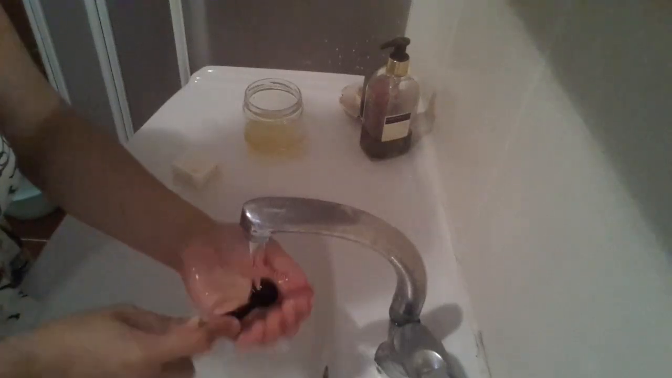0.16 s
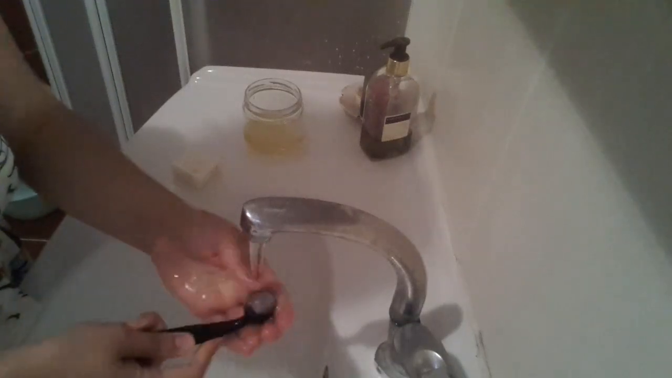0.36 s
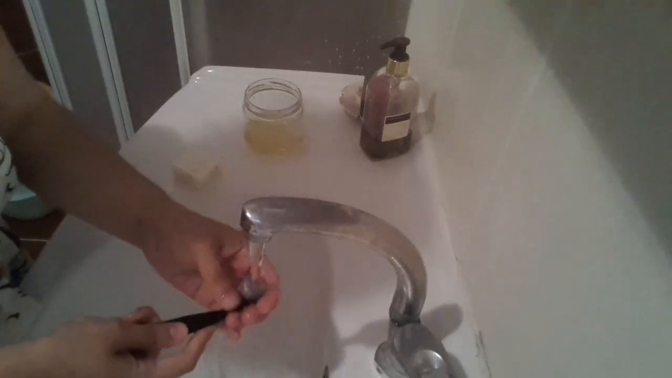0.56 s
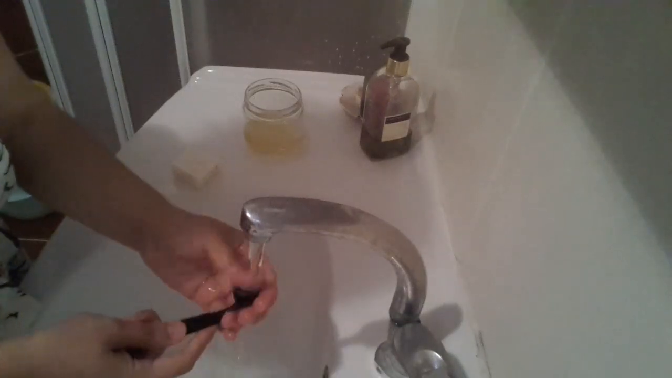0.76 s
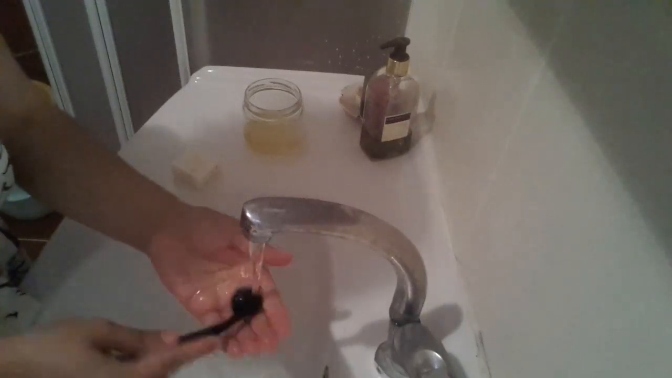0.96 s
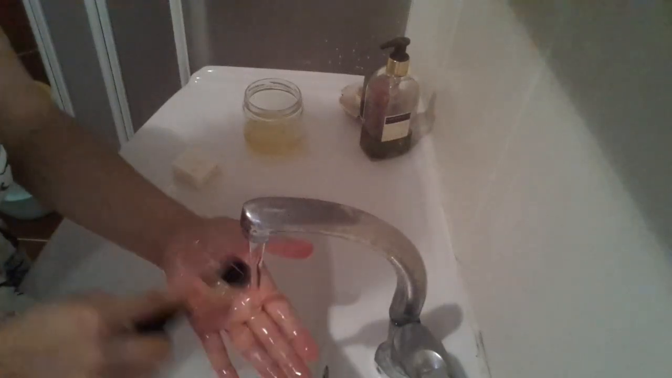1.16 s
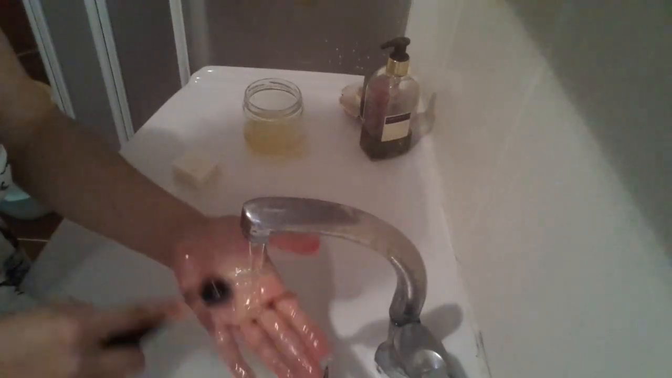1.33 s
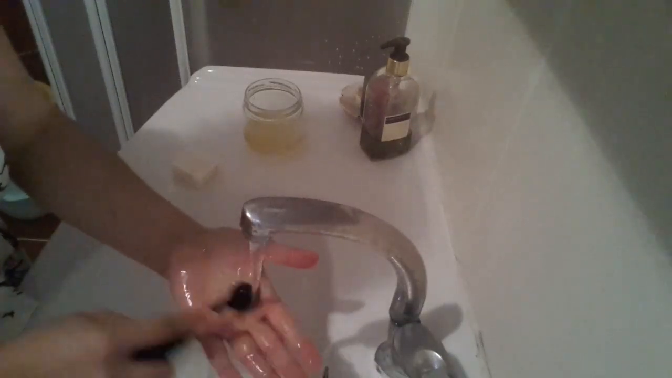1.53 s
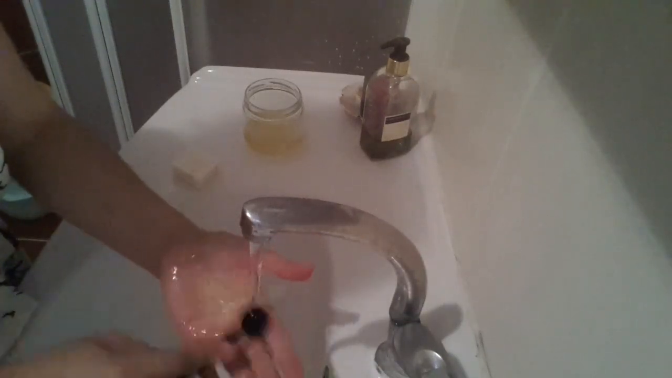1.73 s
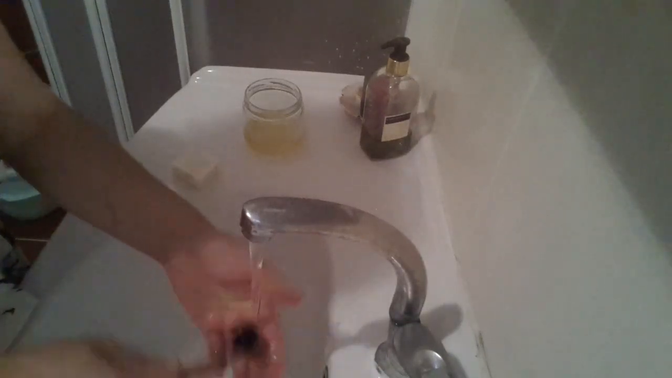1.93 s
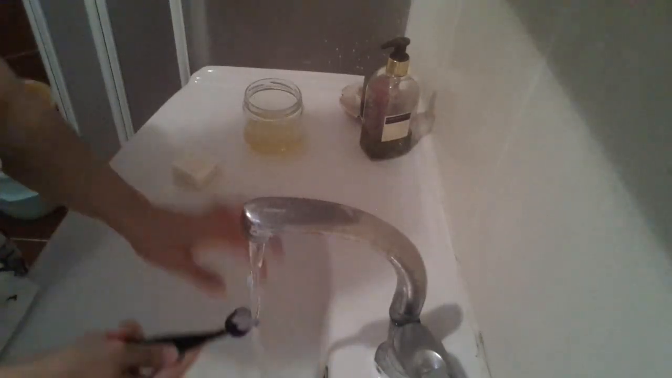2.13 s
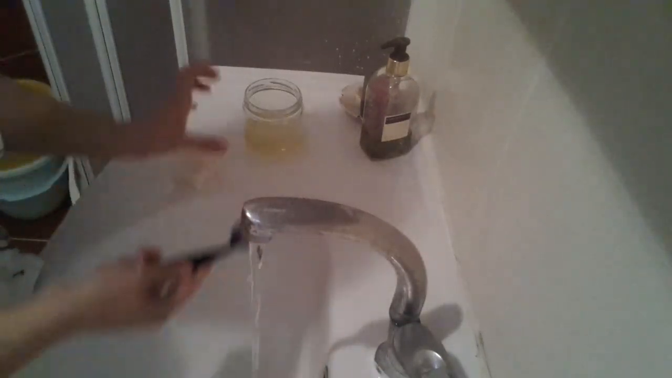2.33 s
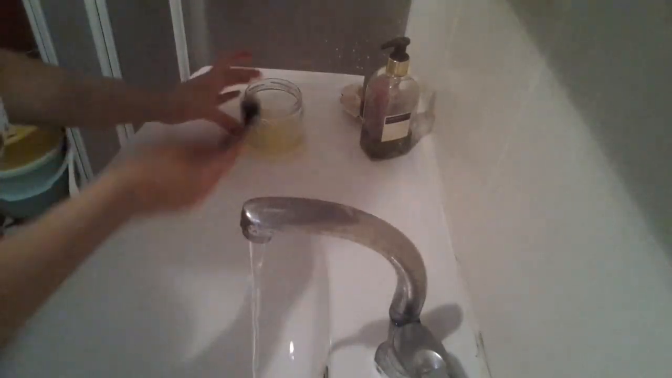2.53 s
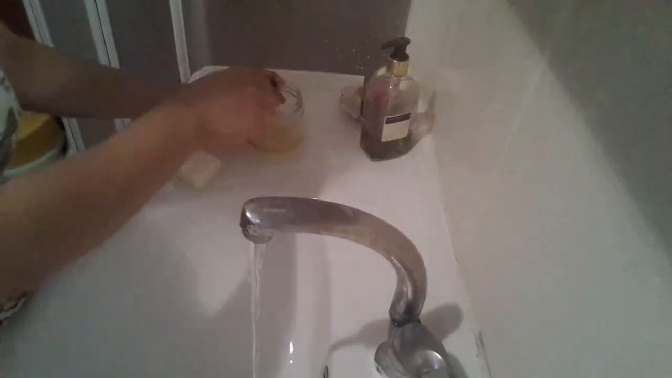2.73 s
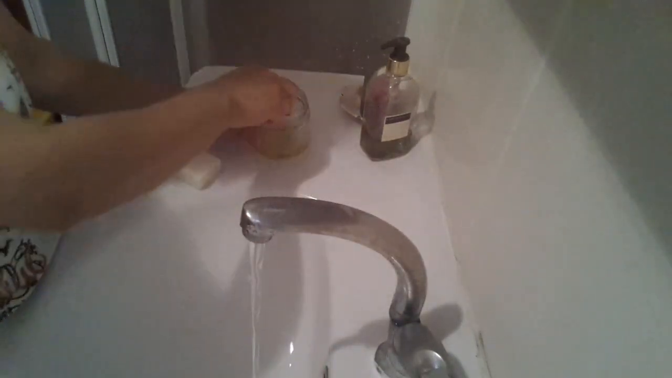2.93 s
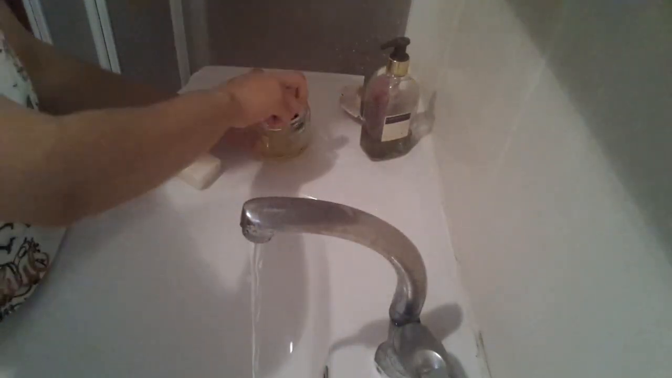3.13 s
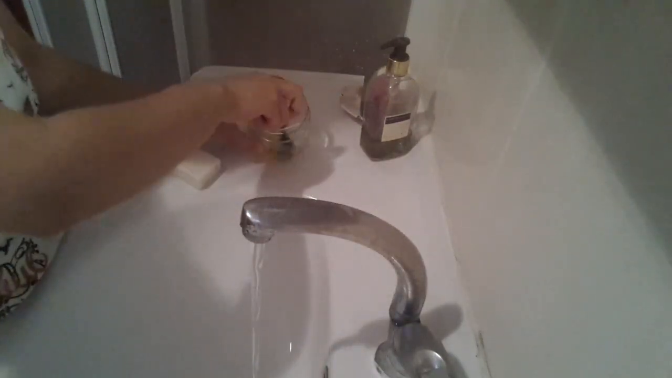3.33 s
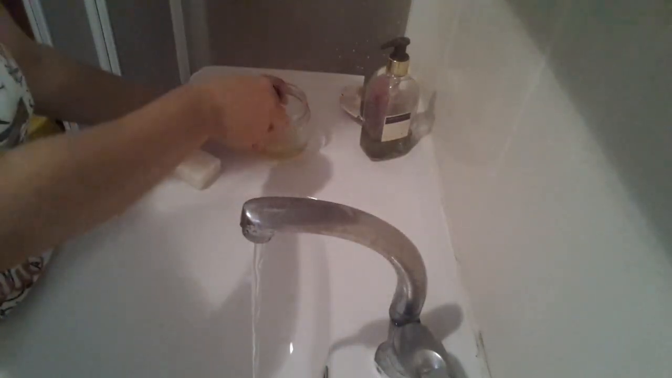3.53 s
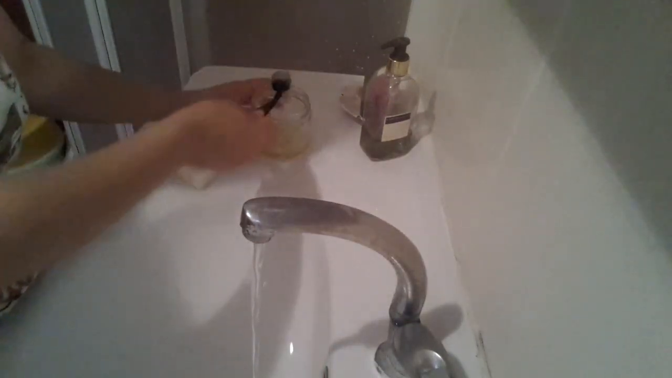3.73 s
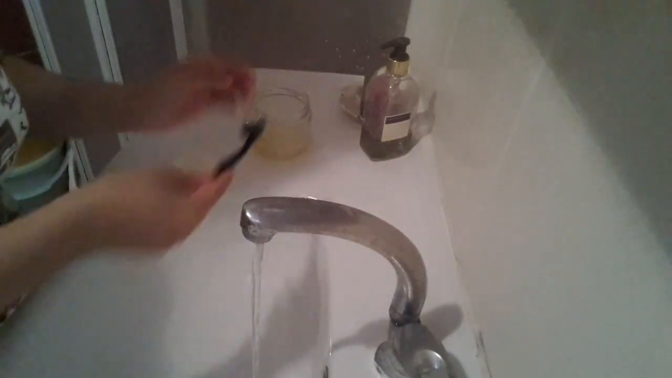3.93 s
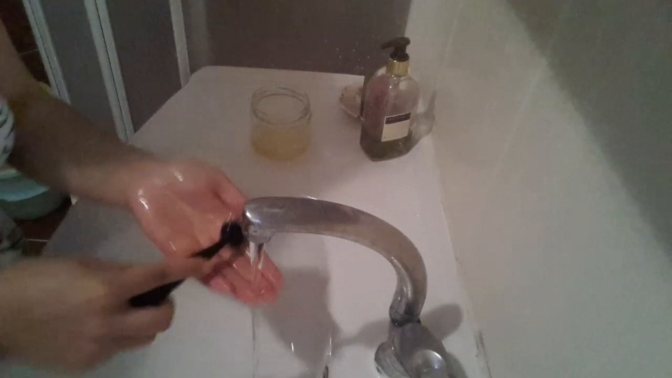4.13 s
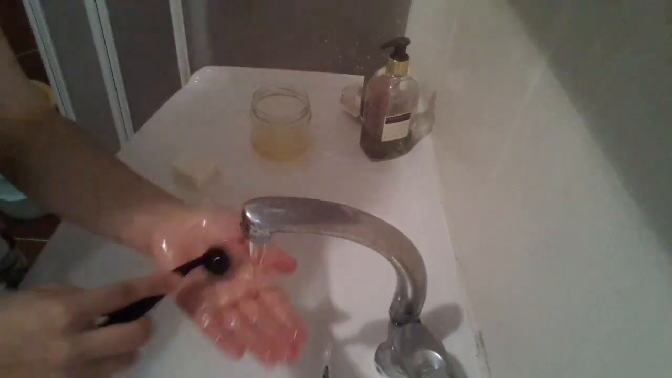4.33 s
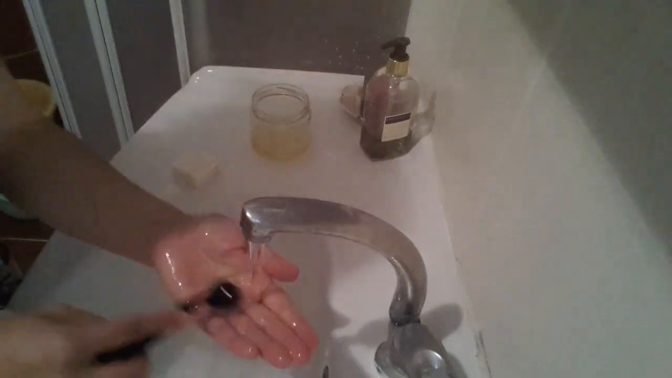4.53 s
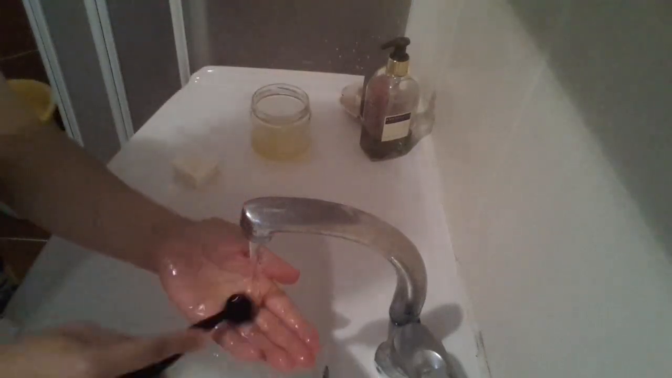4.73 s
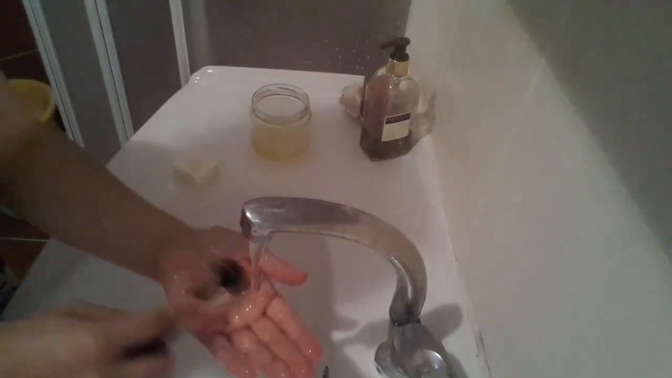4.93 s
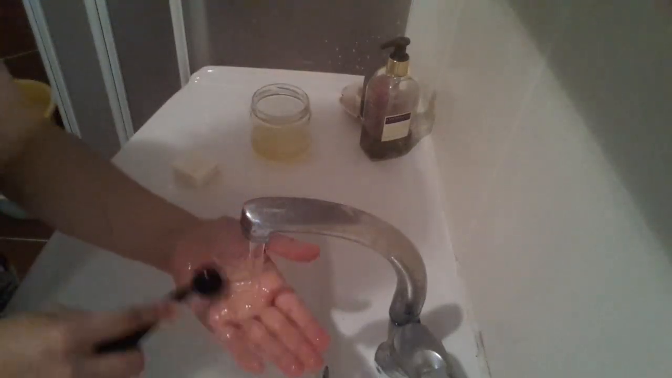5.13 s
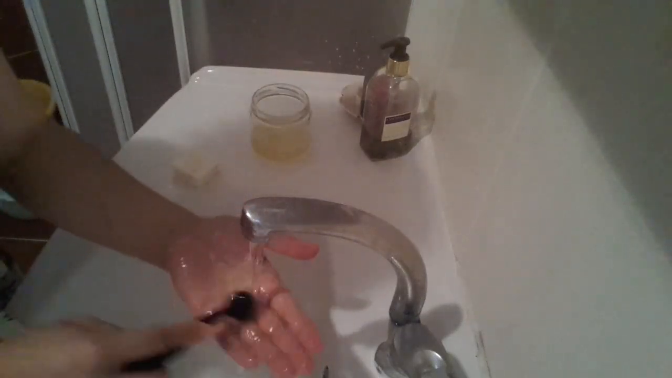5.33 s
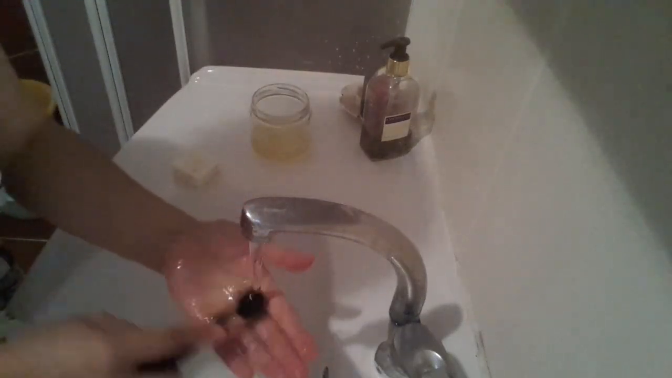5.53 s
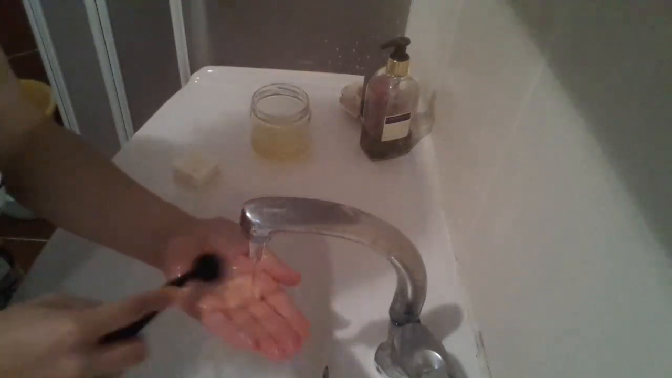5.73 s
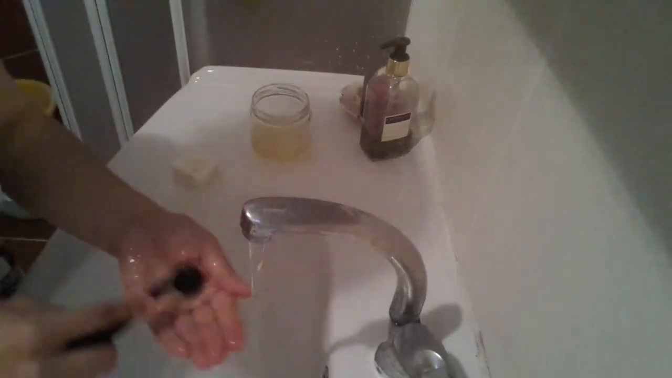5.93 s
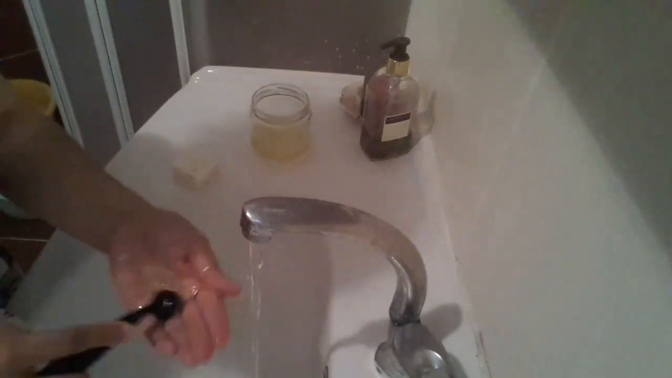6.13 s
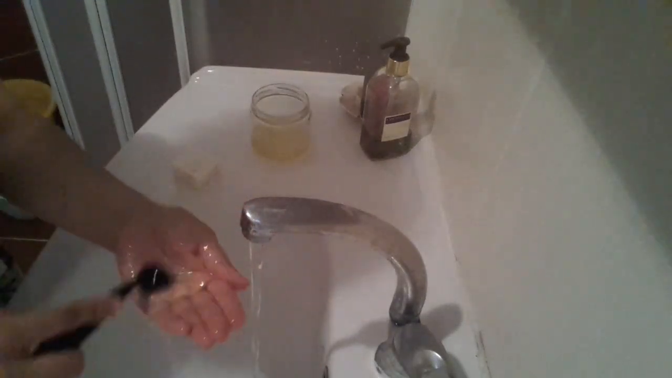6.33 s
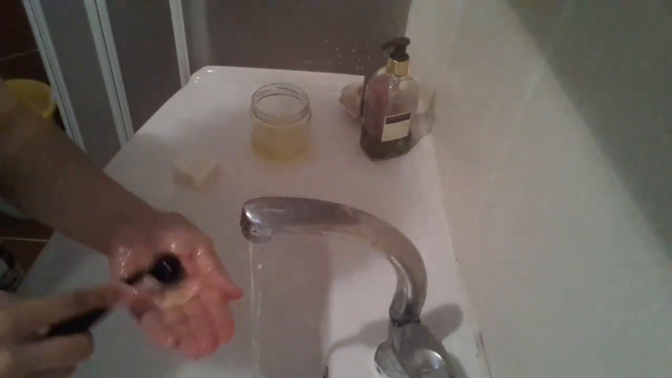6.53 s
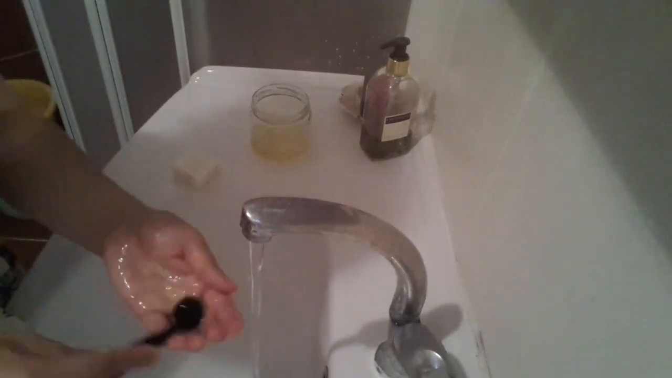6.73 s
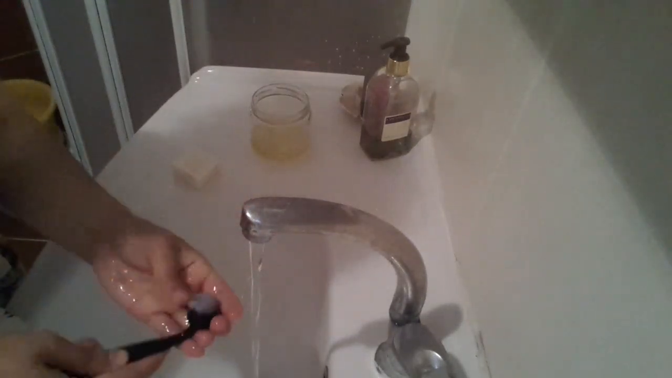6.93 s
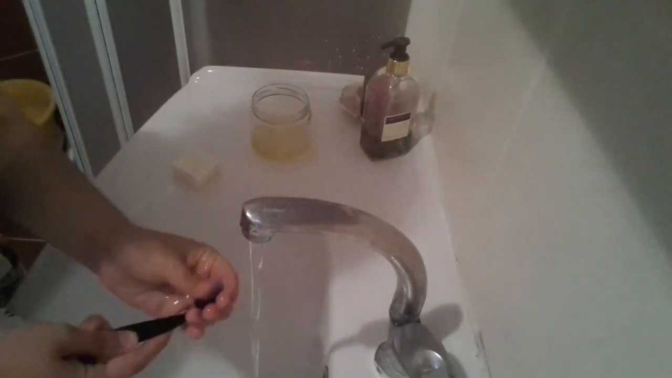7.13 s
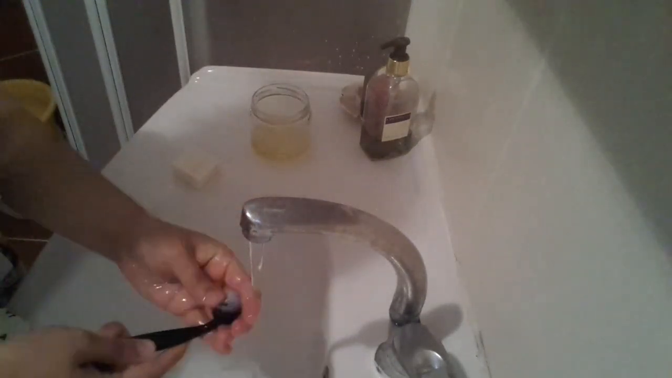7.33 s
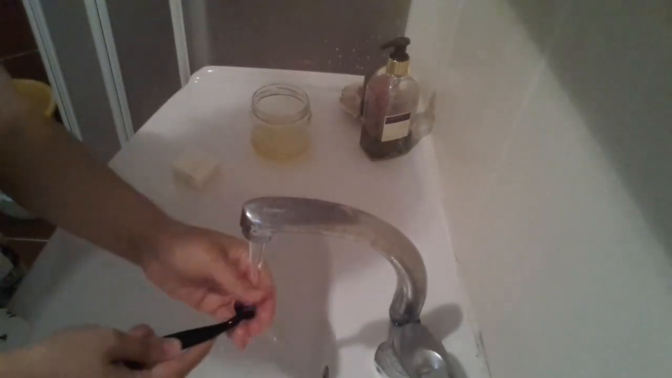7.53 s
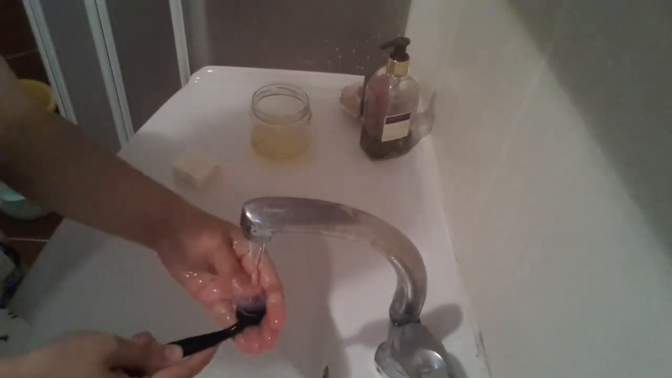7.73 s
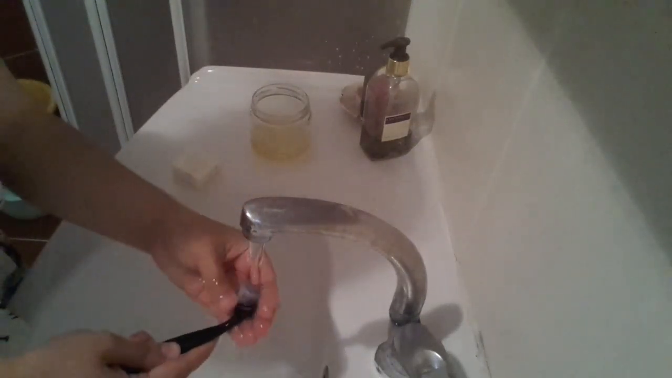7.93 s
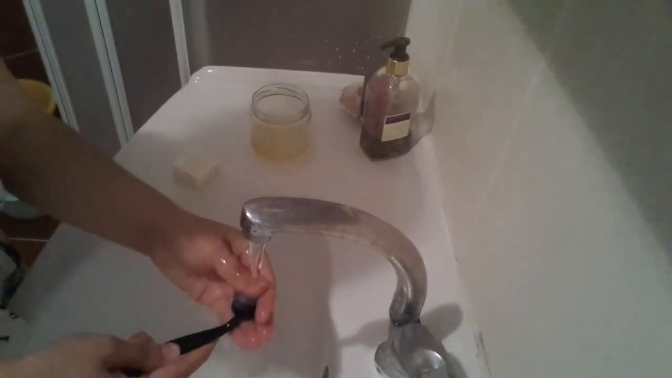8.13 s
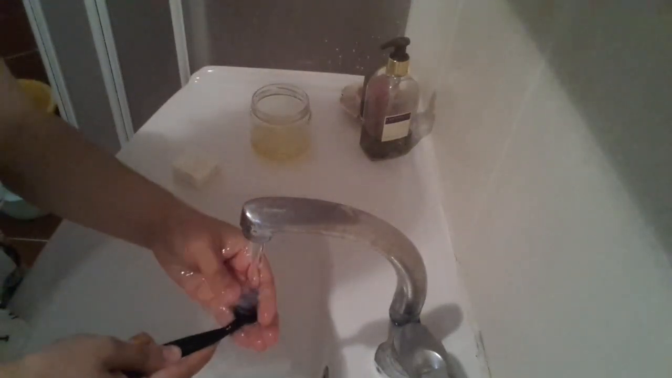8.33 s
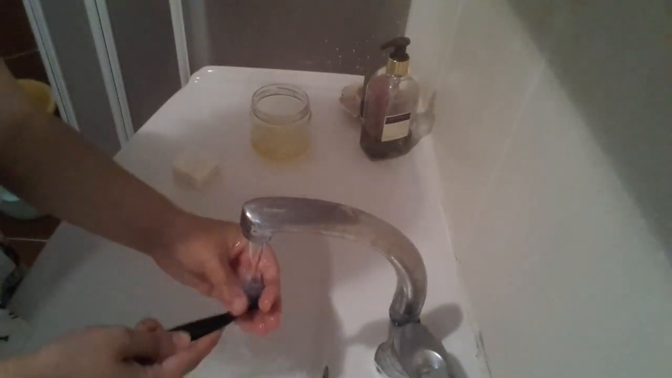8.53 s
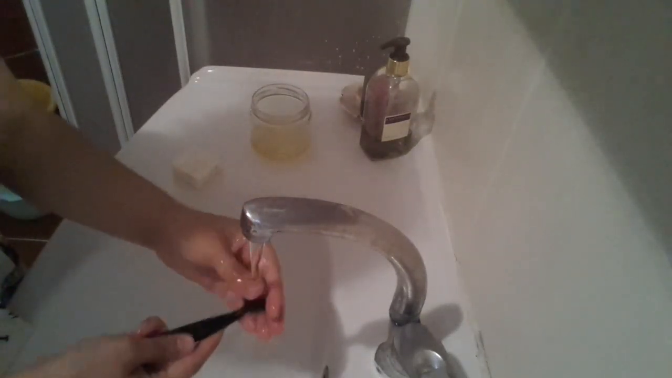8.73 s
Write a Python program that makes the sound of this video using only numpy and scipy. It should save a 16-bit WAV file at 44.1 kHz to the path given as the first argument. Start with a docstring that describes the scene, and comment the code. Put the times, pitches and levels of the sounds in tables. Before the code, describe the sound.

A bathroom tap runs steadily with a thin high whine while a wet brush squelches and crackles against a palm, then clinks in a glass jar.

```python
"""A tap runs into a basin in a small tiled bathroom: shaped noise with hollow resonances, and one thin valve note.
A wet brush is worked against a palm under the stream: air pockets squelch as rising pings, spray crackles as
thousands of tiny bursts, bubbles gulp at the drain as fading tones, and the hands slosh in lumps of dull noise.
About three seconds in, the brush is dipped into a glass jar: bristles scrape, the glass clinks, and the jar knocks
on the basin's rim. Glass and basin ring as sets of decaying tones."""
import sys
import numpy as np
from scipy import signal
from scipy.fft import rfft, irfft, next_fast_len
from scipy.io import wavfile

SR = 44100
rng = np.random.default_rng(int(sys.argv[2]) if len(sys.argv) > 2 else 0)


def unload_wav(signal):
    """Save mono or channel-first audio to the path in sys.argv[1] as 16-bit WAV at rate SR, clipped to [-1, 1]."""
    wavfile.write(
        sys.argv[1],
        SR,
        np.round(np.clip(np.atleast_2d(signal).T, -1, 1) * 32767).astype(np.int16),
    )


N = 386757
TIME = np.arange(N) / SR  # seconds
FREQ = np.fft.rfftfreq(N, 1 / SR)  # Hz


def undb(db):
    """Turn decibels into a gain."""
    return 10 ** (np.asarray(db) / 20)


def unit(x):
    """Scale a sound to an average (rms) level of 1."""
    return x / np.sqrt(np.mean(x ** 2))


def contour(points):
    """Join (Hz, value) points by straight lines on a log-frequency axis."""
    hz, value = np.transpose(points)
    return np.interp(np.log(FREQ + 1), np.log(hz), value)


def shape(x, gain):
    """Filter a sound with one gain for each frequency."""
    size = next_fast_len(N, True)
    gains = np.interp(np.fft.rfftfreq(size, 1 / SR), FREQ, gain)
    return irfft(rfft(x, size) * gains, size)[..., :N]


def band(x, lo_hz, hi_hz, order=2):
    """Keep the band between two frequencies, at least 20 Hz wide."""
    edges = np.clip([lo_hz, max(hi_hz, lo_hz + 20)], 10, SR / 2 - 20)
    return signal.sosfilt(signal.butter(order, edges, "band", fs=SR, output="sos"), x)


def walk(rate):
    """Random wander around 0: chance values, `rate` of them per second, joined by straight lines."""
    knots = rng.standard_normal(4096)
    return np.interp(TIME * rate, np.arange(len(knots)), knots)


def pan(db):
    """Left and right gains that differ by db; a positive value leans left."""
    gains = undb(np.array([[db], [-db]]) / 2)
    return gains / np.sqrt(np.mean(gains ** 2))


def add(out, s, x):
    """Mix a sound in at time s."""
    i = int(np.clip(s * SR, 0, N - 1))
    out[..., i:i + x.shape[-1]] += x[..., :N - i]


def swell(s, length_s, db, attack_s, release_s):
    """Gain of one gesture: it rises, holds until its length is over and dies away."""
    rise = np.clip((TIME - s) / attack_s, 0, 1)
    return undb(db) * rise * np.exp(-np.clip((TIME - s - length_s) / release_s, 0, 20))


def ring(modes):
    """Decaying tones after one blow, each starting at a chance phase."""
    t = TIME[:SR // 2]
    total = 0
    for hz, db, t60 in modes:
        total = total + undb(db - 60 * t / t60) * np.sin(2 * np.pi * (hz * t + rng.random()))
    return total


def pocket(hz, length_s, octaves):
    """An air pocket collapses: its pitch shoots up as it shrinks. Loudest at length_s, at pitch hz."""
    u = np.arange(int(4 * length_s * SR) + 2) / (length_s * SR)
    pitch = np.minimum(hz * 2 ** (octaves * np.tanh(u - 1)), SR / 2)
    swelling = (u * np.exp(1 - u)) ** 4
    return swelling * np.sin(2 * np.pi * np.cumsum(pitch) / SR)


# How alike left and right are. Each row: frequency in Hz, likeness from 0 (unrelated) to 1 (the same).
LIKENESS = [(40, 0), (120, 0.96), (330, 0.93), (520, 0.38), (1000, 0.19), (12000, 0)]


def spread(a, b):
    """Two unrelated sounds become left and right, most alike in the bass."""
    alike = np.clip(contour(LIKENESS), -1, 1)
    mid = shape(a, np.sqrt((1 + alike) / 2))
    side = shape(b, np.sqrt((1 - alike) / 2))
    return np.array([mid + side, mid - side])


# Balance of the two microphone ports. Each row: frequency in Hz, left minus right in dB.
BALANCE = [(100, -1.8), (1000, -.5), (2200, 0.2), (4000, 2), (5500, -2), (8000, -9), (12000, -8)]


def ports(x):
    """The high treble reaches mainly the right port."""
    tilt = undb(contour(BALANCE))
    norm = np.sqrt(2 / (1 + tilt ** 2))
    return np.array([shape(x[0], tilt * norm), shape(x[1], norm)])


ROOM_T60_S = 0.52  # seconds for the lower part of the echo to fall by 60 dB


def room(x, wet_db, treble_t60_s=0.12):
    """Close tiled walls: separate early echoes thicken into a tail whose treble dies sooner."""
    t = TIME[:SR // 2]
    sparse = undb(7 * np.exp(-t / .03) * np.minimum(rng.standard_normal((2, len(t))), 2))
    noise = rng.standard_normal((2, len(t))) * sparse
    low = signal.sosfilt(signal.butter(1, 3000, fs=SR, output="sos"), noise)
    tail = low * 10 ** (-3 * t / ROOM_T60_S) + (noise - low) * 10 ** (-3 * t / treble_t60_s)
    tail = tail * np.clip(t / 0.0035, 0, 1) * (1 + 2.47 * np.exp(-t / 0.005))  # the basin reflects first
    tail /= np.sqrt(np.sum(tail ** 2) / 2)
    return x + undb(wet_db) * signal.fftconvolve(x, tail, axes=1)[:, :N]


# Tone colour of the tap's steady rush. Each row: frequency in Hz, relative level per Hz in dB.
RUSH = [(18, -59), (30, -20.5), (143, -6.5), (190, -7.5), (228, -10.5), (394, -18.5), (485, -23.5),
        (735, -28), (830, -30), (1250, -15), (1600, -13), (2700, -10), (3410, -5.5), (8250, -9.5),
        (15000, -14)]
# Hollow tones of the running water in basin and pipe.
# Each row: frequency in Hz, nominal width in Hz (the filter is half as wide), relative level in dB.
HOLLOWS = [(132.7, 8.9, -72), (393.5, 25, -67), (595, 45, -67.5), (985, 90, -63), (1600, 35, -57),
           (2316, 68, -58.5), (3190, 140, -57), (4550, 280, -52), (8280, 180, -51.5), (9170, 320, -51.5),
           (10500, 1000, -49.5)]


def rush(level_db=-39.5, grain_db=3, flicker_db=1, hollow_db=-1.0, wander_db=3.5):
    """The stream's fine-grained hiss, with hollow resonances that come and go, the low ones most."""
    noise = rng.standard_normal((2, N)) * undb(grain_db * rng.standard_normal((2, N)))
    hiss = shape(noise, undb(contour(RUSH)))
    hiss /= np.std(band(hiss, 3200, 15000))
    hiss *= undb(level_db + flicker_db * walk(30))
    drive = rng.standard_normal((2, N))
    for hz, width_hz, db in HOLLOWS:
        hollow = band(drive, hz - width_hz / 4, hz + width_hz / 4, order=1) * np.sqrt(SR / width_hz)
        depth_db = wander_db * np.sqrt(min(1000 / hz, 2))
        hiss += hollow * undb(db + hollow_db + depth_db * walk(7))
    return spread(*hiss)


# The valve's note. Each row: time in seconds, pitch in Hz, relative level in dB.
WHISTLE = [(0.0, 2995, -40), (0.85, 2985, -42.5), (1.9, 2987, -38), (2.32, 2990, -45), (2.54, 2982, -40),
           (3.61, 3003, -43), (4.78, 2994, -36.5), (5.94, 2997, -38.5), (6.03, 2990, -41.5),
           (7.11, 3002, -39.5), (7.23, 3005, -42), (8.77, 2990, -39)]


def whistle(waver_db=2.0, pan_db=3, lead=1.565, gain_db=2):
    """The valve sings a nearly pure note that wavers in level; left leads right by `lead` radians."""
    s, pitches, levels = np.transpose(WHISTLE)
    hz, db = np.interp(TIME, s, pitches), np.interp(TIME, s, levels)
    phase = 2 * np.pi * np.cumsum(hz + 1.47 * walk(25.35)) / SR
    sides = [np.sin(phase + shift) * undb(waver_db * walk(8.3)) for shift in (lead, 0)]
    return np.sqrt(2) * undb(db + gain_db) * pan(pan_db) * np.array(sides)


# Strokes of the brush over the wet palm. Each row: start in seconds, length in seconds, relative level in dB.
STROKES = [(-.01, .17, -33.5), (0.375, .06, -29), (0.548, .52, -35.5), (0.598, .05, -30), (0.804, .12, -35),
           (1.351, .17, -35.5), (1.559, .055, -26), (1.637, .06, -32), (1.783, .39, -38),
           (2.182, .3, -31.5), (2.296, .06, -25.5), (4.477, 0.014, -31.5), (4.86, .29, -31.5),
           (5.205, .23, -33), (5.483, .38, -34), (5.892, 0.12, -32), (6.043, .14, -37), (6.192, .18, -29),
           (6.412, .15, -41.5), (7.645, .04, -30), (7.89, .07, -33.5), (8.052, .2, -33.5),
           (8.289, .11, -33), (8.422, .14, -32.5)]


def rubbing(uneven_db=3.5, uneven_rate=25, attack_s=0.02, release_s=0.03):
    """How hard the bristles work: the strokes, with uneven pressure."""
    power = sum(swell(s, length, db, attack_s, release_s) ** 2 for s, length, db in STROKES)
    return np.sqrt(power) * undb(uneven_db * walk(uneven_rate))


def spray(effort, count=7000, scatter_db=5, pitch_hz=6500, octaves=0.525, gain_db=-3.0, fizz_db=-1.5):
    """Thousands of tiny pockets and droplets burst over a fizz of bristles, as loud as the brush works."""
    drops = np.zeros((2, N))
    for (when, life), (size, high, side) in zip(rng.random((count, 2)), rng.standard_normal((count, 3))):
        hz = pitch_hz * 2 ** (octaves * max(high, -2))
        burst = pocket(hz, (1 + 3 * life) / hz, 0.44)
        add(drops, when * N / SR, undb(scatter_db * min(size, 2)) * pan(4 * side) * burst)
    # Fizz colour: frequency in Hz, relative level in dB
    colour = [(500, -61), (1500, 0.0), (2500, 9.5), (4300, 9.0), (8500, 16.5), (14000, 9.0)]
    fizz = shape(rng.standard_normal((2, N)), undb(contour(colour)))
    fizz = unit(fizz) * undb(2 * walk(120))
    return unit(unit(drops) + undb(fizz_db) * fizz) * effort * undb(gain_db)


# Big air bubbles that gulp at the drain. Each row: start in seconds, relative peak level in dB, pitch in Hz.
BUBBLES = [(.055, -32, 319), (.286, -34, 330), (.331, -32, 342.6), (.367, -30, 345), (0.41, -34.5, 411),
           (.45, -34.5, 344), (0.489, -34.5, 342.5), (.593, -33, 345.5), (0.612, -36, 415),
           (.655, -42.5, 339), (.731, -39, 401), (0.789, -39.5, 326), (0.871, -31.5, 348),
           (1.464, -34, 353), (1.496, -28, 402), (1.533, -29, 391.6), (1.667, -29.5, 406),
           (1.704, -26, 391.6), (1.883, -36.5, 349.5), (2.233, -27.5, 385), (2.373, -23.5, 367),
           (2.394, -27.5, 399), (2.554, -30, 392.4), (6.266, -23.5, 449), (6.293, -31, 400)]


def bubbles(rise=0.016, gain_db=-2.5, ring_cycles=116, attack_s=0.00082):
    """A bubble pinches off and rings down, rising slightly; the big, low ones last longest."""
    out, t = np.zeros(N), TIME[:SR // 2]
    for s, db, hz in BUBBLES:
        age = hz * t / ring_cycles  # reaches 1 when the tone has fallen by 60 dB
        phase = 2 * np.pi * np.cumsum(hz * (1 + rise * np.minimum(age, 1))) / SR
        fade = np.minimum(t / attack_s, 1) * np.exp(-np.log(1000) * age)
        add(out, s, undb(db + gain_db) * fade * np.sin(phase))
    return np.array([out, out])


# Dull sloshes and rubs as the hands move.
# Each row: start in seconds, length in seconds, relative level in dB, centre in Hz.
SLOSHES = [(0.279, 0.67, -53.5, 360), (1.456, 0.35, -51, 380), (1.656, 0.1, -48.5, 513),
           (2.237, 0.068, -44.5, 440), (2.365, 0.17, -40.5, 380), (2.453, 0.07, -46, 272),
           (2.594, 0.43, -50.5, 160), (2.837, 0.056, -44.5, 388), (2.946, 0.16, -51.5, 445),
           (4.886, 0.037, -49, 380), (5.648, 0.04, -42, 326), (6.261, 0.099, -36.5, 382),
           (8.08, 0.16, -53, 1890)]
SLOSH_ATTACK_S, SLOSH_RELEASE_S = 0.0033, 0.022  # the scrapes use these too


def slosh(lump_db=3, typical_hz=415):
    """Uneven lumps of dull, broad noise, each gesture coloured higher or lower."""
    # Colour of a typical slosh: frequency in Hz, relative level in dB
    colour = np.array([(60, -44), (140, -23.0), (380, 9.0), (540, 0), (800, -4.0),
                       (1200, -9.0), (1800, -20.0), (3000, -23.0), (7000, -69)])
    noise, out = rng.standard_normal((2, N)) * undb(lump_db * walk(90)), 0
    for s, length, db, hz in SLOSHES:
        lumps = shape(noise, undb(contour(colour * [hz / typical_hz, 1])))
        out = out + unit(lumps) * swell(s, length, db, SLOSH_ATTACK_S, SLOSH_RELEASE_S)
    return out


def spatter(drops_per_s=150, level_db=-4, scatter_db=3, pitch_hz=1600, octaves=0.365, cycles=4.9):
    """Sloshing water flings drops that plip into the basin, lower than the brush's pockets."""
    out = np.zeros((2, N))
    for start, length, db, _ in SLOSHES:
        drops = rng.standard_normal((40, 4))[:int(drops_per_s * length)]  # at most 40 for each slosh
        for when, size, high, side in drops:
            hz = pitch_hz * 2 ** (octaves * np.clip(high, -2, 2))
            gains = undb(db + level_db + scatter_db * min(size, 1.5)) * pan(3 * side)
            add(out, start + length * (when % 1), gains * pocket(hz, cycles / hz, 0.1))
    return out


def weak_squelches(effort, count=60, level_db=-26, scatter_db=4, octaves=0.38):
    """Lesser pockets burst by chance, more often the harder the brush works: rows like SQUELCHES."""
    collapse_s, typical_hz, glide, snap_db = 0.0012, 5420, 0.053, -28
    work = np.cumsum(effort ** 1.4) / np.sum(effort ** 1.4)
    times = np.interp((np.arange(count) + rng.random(count)) / count, work, TIME)
    rows = []
    for s, (size, high, slow) in zip(times, np.clip(rng.standard_normal((count, 3)), -2, 2)):
        hz = typical_hz * 2 ** (octaves * high)
        rows.append((s, level_db + scatter_db * min(size, 1), hz, collapse_s * 2 ** (slow / 2), glide, snap_db))
    return rows


# Air pockets squeezed out of the wet bristles, from steady pings to rising squirts.
# Each row: time in seconds, relative level in dB, pitch in Hz, collapse time in seconds,
# upward glide in octaves, relative snap of the water film in dB.
SQUELCHES = [(0.3818, -20, 5230, 0.001, 0.2, -2), (0.392, -17, 4830, 0.00094, 0, -13),
             (0.4197, -13, 3570, 0.00076, 0.0, -14), (0.5314, -17.5, 4800, 0.00099, 0.03, -8),
             (0.6042, -12.5, 7800, 0.0009, 0.33, -19), (0.633, -17, 4700, 0.0014, 0.75, -7),
             (0.644, -19, 11360, 0.0009, 0, -14), (0.706, -18, 4300, 0.00097, 0, -6),
             (0.7698, -14.5, 4900, 0.00084, 0.46, -15), (0.828, -14.5, 7400, 0.001, 0.67, -13),
             (0.872, -15.5, 7980, 0.0011, 0.36, -12), (0.89, -19.5, 11090, 0.001, 0.17, -5),
             (0.9164, -13, 5300, 0.00093, 0.33, -11), (0.9835, -12.5, 5500, 0.0011, 0.4, -10),
             (0.997, -19, 4300, 0.0015, 0.078, -13), (1.057, -17, 8840, 0.001, 0.26, -17),
             (1.6, -15, 8000, 0.001, 0.44, -12), (1.6123, -17, 6300, 0.0009, 0.18, -10),
             (1.6816, -10.5, 3670, 0.0012, 0.36, -9), (2.1823, -16.5, 7770, 0.0008, 0.42, -7.5),
             (2.3371, -21, 4300, 0.0019, 0.0, 3), (4.3702, -19, 11500, 0.00048, 0.13, 1.5),
             (4.8551, -13.5, 6600, 0.0009, 0.65, -17), (4.908, -23, 5900, 0.00089, 0.36, -8),
             (4.971, -19, 6700, 0.00099, 0, -27), (5.007, -13, 5500, 0.00058, 0, -13),
             (5.029, -14.5, 5200, 0.0008, 0.11, -22), (5.253, -17.0, 9350, 0.00087, 0.085, -5),
             (5.374, -18, 4930, 0.0015, 0.76, -9), (5.3865, -13, 8300, 0.0008, 0.25, -20),
             (5.4538, -19.5, 4000, 0.0011, 0, -17), (5.4954, -22, 4740, 0.0013, 0.0, -2),
             (5.7017, -13.5, 5180, 0.00097, 0.064, -10), (5.794, -15.5, 8000, 0.00079, 0.37, -20),
             (5.9119, -14, 5120, 0.0008, 0.3, -21), (5.9507, -17.5, 5400, 0.0015, 0.46, -4),
             (5.9783, -11.5, 3800, 0.00089, 0, -2.5), (6.093, -17, 8400, 0.00059, 0.11, -7),
             (6.2285, -16, 4650, 0.0014, 0.04, -15), (6.2554, -14.5, 4750, 0.0009, 0, -18),
             (6.2793, -14.5, 9060, 0.0008, 0.18, -16), (6.3005, -17.5, 5440, 0.0008, 0, -21),
             (6.36, -21.5, 3580, 0.0018, 0.11, -3), (6.423, -11.5, 8850, 0.001, 0.27, -22),
             (6.4985, -16, 10600, 0.0007, 0.25, -10), (6.54, -18.5, 8600, 0.00066, 0.22, -16),
             (7.0123, -14, 5970, 0.00092, 0.86, -9), (7.6698, -15.5, 4750, 0.00074, 0.098, -23),
             (7.9383, -11.5, 8660, 0.0008, 0.19, -24), (8.0492, -18, 6170, 0.0009, 0.28, -5),
             (8.101, -16, 4110, 0.0012, 0.15, -4), (8.1357, -11.5, 7200, 0.001, 0.54, -21),
             (8.23, -21.5, 4100, 0.0016, 0.054, -9), (8.269, -20.5, 5120, 0.0011, 0.37, -6),
             (8.2915, -19, 8720, 0.0012, 0.031, -16), (8.3022, -18, 6300, 0.0009, 0.0, -9),
             (8.3148, -11.5, 4630, 0.00058, 0.0, -11), (8.3296, -16, 4600, 0.0007, 0.27, -11),
             (8.367, -14.5, 4920, 0.00133, 0, -12), (8.4902, -16.5, 4760, 0.0017, 0, -6),
             (8.5342, -19, 4730, 0.001, 0.19, -8), (8.5777, -11, 5140, 0.0015, 0.34, -8)]
CENTRE_HZ, PAN_DB_PER_OCTAVE = 4400, -11  # higher pockets reach mainly the right port


def squelches(effort, gain_db=2.45, snap_db=2.7, snap_s=.0013, froth_db=-20, froth_s=0.0071,
              small_db=-14, small_s=0.0067, count=3):
    """The water film snaps, a pocket pings or chirps upward, and smaller pockets and froth burst around it."""
    out, t = np.zeros((2, N)), TIME[:SR // 20]
    for s, db, hz, life, glide, film_db in list(SQUELCHES) + weak_squelches(effort):
        pan_db = PAN_DB_PER_OCTAVE * np.log2(hz / CENTRE_HZ)
        gains = undb(db + gain_db) * pan(pan_db)
        # Left and right get slightly different pitches
        pings = np.array([pocket(hz * rng.uniform(0.904, 1.036), life, glide) for _ in range(2)])
        add(out, s - life, gains * pings)
        for late, size, high, side in rng.standard_normal((count, 4)):
            small = pocket(hz * 2 ** (0.186 * high), life, glide) * undb(db + small_db + 2 * size)
            add(out, s + small_s * abs(late + 1), pan(pan_db + 4 * side) * small)
        crackle = rng.standard_normal((2, len(t))) * undb(4 * rng.standard_normal(len(t)))
        snap = unit(band(crackle, 0.78 * hz, 1.9 * hz)) * undb(snap_db + film_db) * np.exp(-t / snap_s)
        froth = unit(band(crackle, 0.62 * hz, 1.66 * hz)) * undb(froth_db) * np.exp(-t / froth_s)
        add(out, s - life / 2, gains * (snap + froth))
    return out


# Drops that plop into the cupped palm. Each row: start in seconds, relative peak level in dB, pitch in Hz.
PLOPS = [(0.587, -31.5, 1545), (4.9694, -28, 2240), (8.0986, -22.5, 2120), (8.209, -29, 1890),
         (8.2097, -32.5, 1102)]


def plops(cycles=48, gain_db=-1, trail_db=-11, trail_s=.028, octaves=0.085, count=4):
    """A drop traps a short-lived bubble, and a few quieter ones of scattered pitch tumble after it."""
    out, t = np.zeros((2, N)), TIME[:SR // 20]

    def blip(hz):
        """A tone that falls by 60 dB in a fixed number of cycles."""
        return np.exp(-np.log(1000) * hz * t / cycles) * np.sin(2 * np.pi * hz * t)

    for s, db, hz in PLOPS:
        add(out, s, undb(db + gain_db) * blip(hz))
        for late, (size, high, side) in zip(rng.random(count), rng.standard_normal((count, 3))):
            gains = undb(db + trail_db + 2 * size) * pan(2 * side)
            add(out, s + trail_s * late, gains * blip(hz * 2 ** (octaves * high)))
    return out


# Tones of the basin when struck. Each row: frequency in Hz, relative level in dB, seconds to fall by 60 dB.
BASIN = [(246, -19, 0.18), (352.5, -1.5, 0.26), (390, -11, 0.2), (530, 5, 0.07), (750, -11, 0.36),
         (787.5, -1, 0.28), (871, -1.5, 0.42), (887, 3, .2), (940, -7.5, 0.52), (1232, -4.5, 0.38),
         (1386, -0.5, 0.11), (1519, 3, 0.15), (1613, 6.5, 0.12), (1716, 4, 0.17), (1780, 4, 0.12),
         (2390, 7, 0.15)]
# Blows on the basin, from falling water (soft) and the rocking jar (hard).
# Each row: start in seconds, peak level in dB before the last filter, lowest Hz, highest Hz,
# damping time in seconds.
KNOCKS = [(2.234, -32.5, 250, 910, 0.054), (2.372, -26.5, 300, 1690, 0.02), (2.387, -31, 600, 1000, .02),
          (2.4436, -18, 173, 1620, 0.0048), (2.4444, -21, 151, 380, 0.017), (2.449, -22, 160, 1600, 0.024),
          (2.467, -28, 200.6, 1690, .012), (2.501, -29, 170, 660, 0.018), (2.862, -32, 230, 590, 0.021),
          (2.975, -34, 300, 1000, 0.029), (3.026, -29.5, 480, 1800, 0.022), (3.04, -26.5, 810, 1080, 0.013),
          (3.135, -24.5, 500, 1090, 0.39), (3.415, -23, 633, 863, 0.058), (3.416, -25.5, 901, 2700, 0.0085),
          (3.65, -32, 1415, 2170, 0.028), (3.81, -15.5, 760, 1924, 0.027), (3.8186, -8, 340, 2900, 0.045),
          (3.827, -12.5, 363, 2800, 0.055), (3.835, -11, 450, 1800, 0.032), (3.859, -24, 710, 1020, 0.11),
          (3.877, -25, 710, 1130, 0.031), (6.266, -25.5, 283, 890, 0.0094)]


def knocks(thud_db=3, thud_s=0.024, top_hz=3100):
    """Each blow rings the thick, dull basin in the range that its contact can reach; the contact damps it."""
    out, t = np.zeros((2, N)), TIME[:SR // 2]
    for s, db, lo_hz, hi_hz, damping_s in KNOCKS:
        for side in out:
            thud = undb(thud_db) * 4 * rng.standard_normal(len(t)) * np.exp(-t / thud_s)
            blow = band((ring(BASIN) + thud) * np.exp(-t / damping_s), lo_hz, hi_hz, order=3)
            add(side, s, undb(db) * blow / np.max(np.abs(blow)))
    return band(out, 18, top_hz, order=8)


# The brush scrapes the jar's inner wall.
# Each row: start in seconds, length in seconds, relative level in dB, starting pitch in Hz, ending pitch in Hz.
SCRAPES = [(2.685, 0.01, -43, 1796, 1440), (2.848, 0.083, -41.5, 1767, 2310),
           (2.957, 0.143, -50.5, 877, 942)]


def scrapes(chatter_db=7, width_hz=450):
    """Bristles catch and slip on the glass: a grainy rasp whose pitch slides."""
    out = 0
    slips = rng.standard_normal((2, N)) * undb(chatter_db * np.minimum(walk(260), 1.5))
    rasp = unit(band(slips, 16, width_hz / 2))
    for s, length, db, start_hz, end_hz in SCRAPES:
        pitch = np.interp(TIME, [s, s + length], [start_hz, end_hz])
        tone = np.sin(2 * np.pi * np.cumsum(pitch) / SR)
        out = out + rasp * tone * swell(s, length, db, SLOSH_ATTACK_S, SLOSH_RELEASE_S)
    return out


# Tones of the glass jar. Each row: frequency in Hz, relative level in dB, seconds to fall by 60 dB.
JAR = [(2337, -3, 0.066), (2475, 0.5, 0.047), (5860, -1.5, 0.03), (6170, -4, 0.034), (6255, 6, 0.085),
       (6440, 1, 0.055), (9335, -11.5, 0.12), (9480, -13, 0.06)]
# The brush handle strikes the jar and bounces. Each row: start in seconds, relative peak level in dB.
CLINKS = [(3.1326, -7), (3.1358, -9.5), (3.162, -19)]


def clinks(tick_db=-8, tick_s=0.0065, pan_db=0.5, gain_db=5.0):
    """A hard tick and the short ring of the hand-held jar."""
    out, t = np.zeros((2, N)), TIME[:SR // 2]
    for s, db in CLINKS:
        tick = unit(band(rng.standard_normal((2, len(t))), 2300, 5300)) * np.exp(-t / tick_s)
        clink = np.array([ring(JAR), ring(JAR)]) + undb(tick_db) * tick
        add(out, s, undb(db + gain_db) * pan(pan_db) * clink / np.max(np.abs(clink)))
    return band(out, 700, 13000)


def scene():
    """Tap, hands, basin and jar in the tiled room."""
    effort = rubbing()
    water = ports(room(rush(), wet_db=-7.5) + room(spray(effort), wet_db=-1.5))
    gulps = pan(-1.8) * room(bubbles(), wet_db=-11)
    pops = room(squelches(effort) + plops(), wet_db=-3.0)
    basin_sounds = slosh() + spatter() + knocks() + scrapes()
    basin = pan(-1.0) * spread(*room(basin_sounds, wet_db=-7.5))
    jar = ports(room(clinks(), wet_db=-3, treble_t60_s=.3))
    return whistle() + water + gulps + pops + basin + jar


def record(dry):
    """The recorder cuts off everything above about 14.5 kHz."""
    return signal.sosfilt(signal.ellip(8, .2, 70, 14500, fs=SR, output="sos"), dry)


dry = scene()
out = record(dry)
unload_wav(out)
```